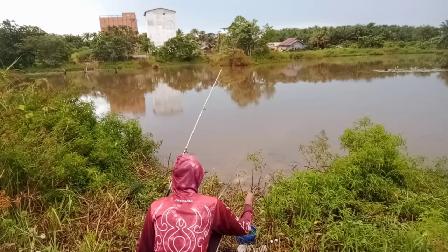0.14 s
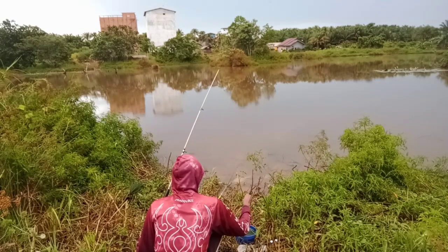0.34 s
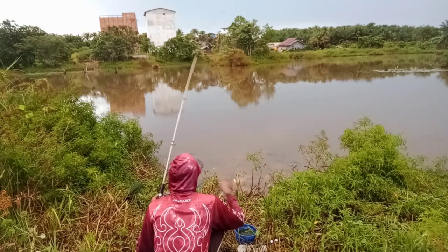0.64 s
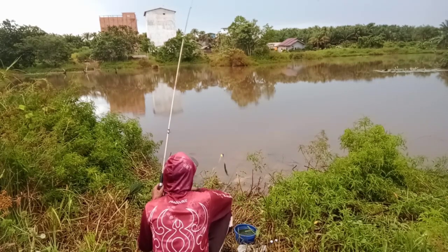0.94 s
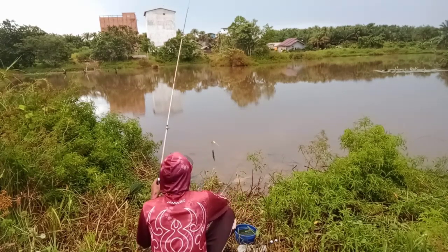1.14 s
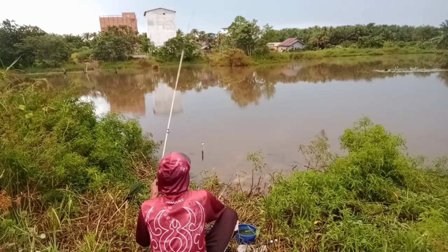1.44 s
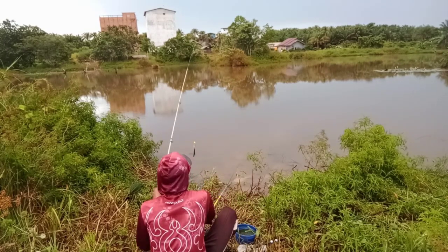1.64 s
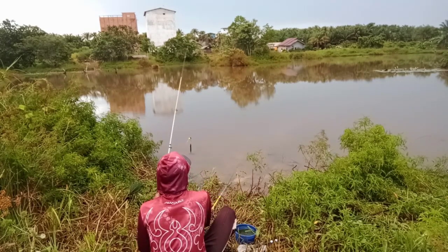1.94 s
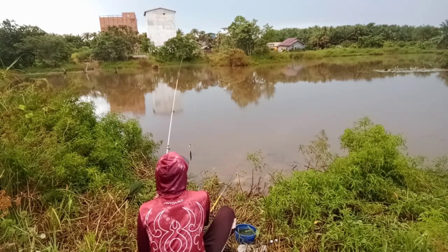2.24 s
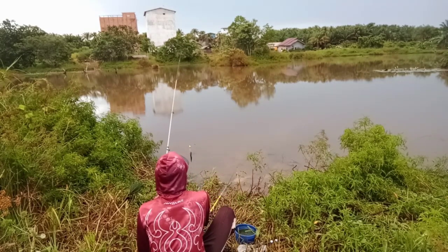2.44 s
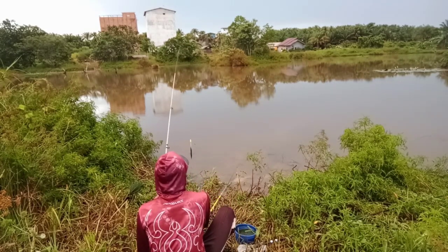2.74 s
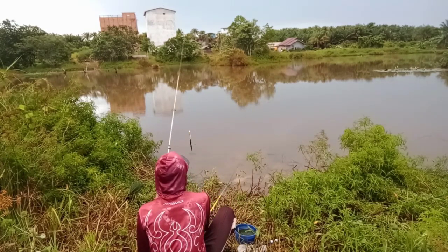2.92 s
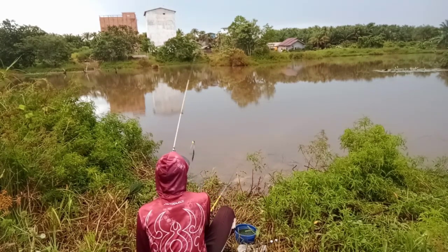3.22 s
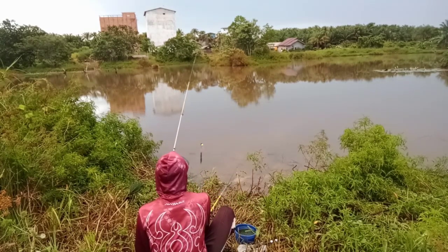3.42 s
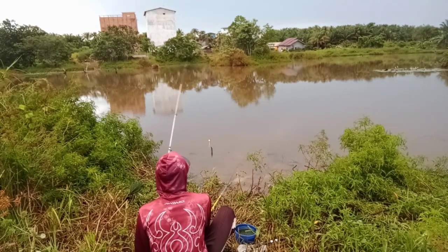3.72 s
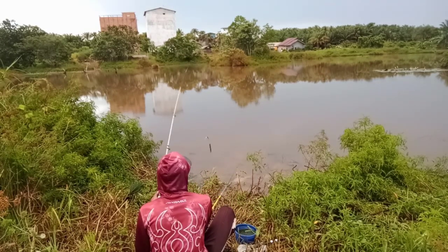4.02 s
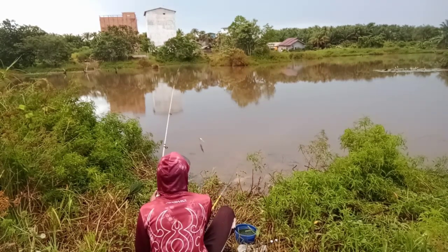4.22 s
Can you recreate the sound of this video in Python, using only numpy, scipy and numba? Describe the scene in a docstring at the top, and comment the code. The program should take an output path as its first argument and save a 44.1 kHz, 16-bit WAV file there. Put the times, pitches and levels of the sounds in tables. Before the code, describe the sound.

A close frog croaks quickly over other clicking, trilling frogs, high insect rasps and a faint distant chorus.

```python
"""Evening at a pond

A phone on the bank. Close by, a frog croaks about six times a second on two beating membranes; further
off, another answers higher up, and others tick, trill and whoop. A katydid scrapes its wings, mostly four
strokes at a time. Crickets sing and a thin whine grows over a distant chorus, hiss and a far rumble."""
import sys
import numpy as np
from scipy import signal
from scipy.fft import rfft, irfft
from scipy.io import wavfile
from scipy.ndimage import uniform_filter1d
from numba import njit

SR = 44100
rng = np.random.default_rng(int(sys.argv[2]) if len(sys.argv) > 2 else 0)


def log_audio(samples):
    """Write samples as a 16-bit WAV file to the path given in sys.argv[1]."""
    # one column per channel
    frames = np.atleast_2d(samples).T
    # limit to full scale, then quantise
    limited = np.clip(frames, -1, 1)
    pcm = np.round(limited * 32767).astype(np.int16)
    wavfile.write(sys.argv[1], SR, pcm)


N = 192849


def undb(db):
    """Decibels to gain."""
    return 10 ** (np.asarray(db) / 20)


def unit(x):
    """Scale to an rms of 1."""
    return x / np.sqrt(np.mean(x ** 2))


def sine(hz):
    """A sine that follows a pitch given sample by sample."""
    return np.sin(2 * np.pi * np.cumsum(hz) / SR)


@njit
def svf(x, hz, width):
    """State-variable band-pass whose centre may move; gain 1 at the centre."""
    y, band_state, low_state = np.empty(len(x)), 0., 0.
    for i in range(len(x)):
        g, damping = np.tan(np.pi * hz[i] / SR), width / hz[i]
        v = (band_state + g * (x[i] - low_state)) / (1 + g * (g + damping))
        band_state, low_state = 2 * v - band_state, low_state + 2 * g * v
        y[i] = damping * v
    return y


def band(x, hz, width):
    """A resonance applied twice, so its skirts are steep."""
    hz, width = hz * np.ones(N), float(width)
    return svf(svf(x, hz, width), hz, width)


def walk(rate):
    """Random levels held 1 / rate s and smoothed twice; rms 1."""
    hold = int(SR / rate)
    steps = np.repeat(rng.standard_normal(N // hold + 1), hold)
    return unit(uniform_filter1d(uniform_filter1d(steps, hold), hold)[:N])


def pulses(hz, jitter, scatter_db, breath):
    """One click a cycle, wavering in rate and size, with air noise gated by the cycle."""
    phase = np.cumsum(hz * (1 + jitter * walk(300))) / SR
    click = np.exp(40 * (np.cos(2 * np.pi * phase) - 1))
    sizes = undb(scatter_db * rng.standard_normal(int(phase[-1]) + 2))
    air = unit(rng.standard_normal(N) * (.4 + click))
    return unit(click * sizes[np.round(phase).astype(int)]) + breath * air


def coloured(spectrum, flicker_db, per_octave):
    """Noise shaped by (Hz, dB) points, in bands that each flicker alone; rms 1."""
    hz, db = np.transpose(spectrum)
    octave = np.log2(np.arange(1, N // 2 + 2) * SR / N)
    shaped = rfft(rng.standard_normal(N)) * undb(np.interp(octave, np.log2(hz), db, -90, -90))
    out = 0
    for centre in np.arange(np.log2(hz[0]), np.log2(hz[-1]), 1 / per_octave):
        share = np.clip(1 - per_octave * abs(octave - centre), 0, 1)
        out += irfft(shaped * share, N) * undb(flicker_db * walk(18))
    return unit(out)


def add(out, s, piece):
    """Mix a piece in at time s."""
    i = max(int(s * SR), 0)
    out[i:i + len(piece)] += piece[:N - i]


def near_frog():
    """Close to the microphone: two membranes beat near 2.2 kHz, and raspy pulses ring the throat."""
    # Croaks, plus one early soft trill near 2.2 kHz (at .11 s):
    # (time [s], length [s], level [dB], opening boost [dB], catch depth [dB], opening pitch [Hz],
    # catch pitch [Hz], upper throat [dB], low throat [dB])
    calls = [(0.0, 0.047, -35.5, 3.5, 4, 2076, 2135, -49.5, -47),
             (.11, 0.11, -39.5, 0, 4, 2213, 2226, -75, -52),
             (1.206, .063, -35, 2.5, -3.5, 2200, 2250, -37.5, -59),
             (1.349, 0.089, -33, -0.5, -2.5, 2248, 2250, -39.5, -58.5),
             (1.526, 0.091, -31.5, -0.5, -1.5, 2280, 2270, -37.5, -53.5),
             (1.709, 0.097, -30.5, 5.5, 3, 2220, 2120, -39.5, -52),
             (1.888, 0.091, -31.5, -3, -1.5, 2240, 2100, -39.5, -56),
             (2.074, 0.081, -30.5, 1.5, 4.5, 2199, 2050, -38, -55),
             (2.24, 0.092, -30.5, -2, 2.5, 2196, 2190, -39.5, -58),
             (2.407, 0.095, -31.5, -10.5, -2.5, 2198, 2130, -40.5, -58),
             (2.592, 0.093, -30, 2, 5, 2178, 2090, -43.5, -54),
             (2.781, 0.08, -31, -2.5, 8, 2056, 2070, -42, -56),
             (2.954, 0.087, -30.5, 1, 10, 2074, 2070, -44.5, -52.5),
             (3.135, 0.084, -31, 0.5, 11.5, 2114, 2000, -43.5, -57),
             (3.327, .076, -35.5, -5.5, 13, 2027, 2030, -44, -51.5),
             (3.399, 0.081, -40, 10, 3, 2151, 2000, -68, -40),
             (3.49, 0.064, -29.5, 2.5, 17, 2088, 2050, -45, -49),
             (3.649, 0.077, -30.5, 2.5, 10, 2106, 2070, -43.5, -54),
             (3.817, 0.091, -30, -2, 2, 2215, 2120, -42, -56),
             (3.992, 0.091, -31, 4, 3, 2160, 2060, -42.5, -50.5),
             (4.173, 0.085, -31.5, 4, 10, 2127, 2070, -41.5, -52),
             (4.339, .08, -28.5, -4, 6, 2278, 2120, -40, -44)]
    opening_s, catch_s, catch_width_s = .015, .028, .011  # a short first note, then the breath catches
    closing_hz, closing_fade_db = 2213., -10
    sac_gain, upper_gain, low_gain, progress, solo = np.zeros((5, N))
    hz = np.full(N, closing_hz)
    for s, length, db, opening_db, catch_db, opening_hz, catch_hz, upper_db, low_db in calls:
        t = np.arange(int(length * SR)) / SR
        u = t / length
        opening = np.exp(-(t / opening_s) ** 4)
        catch = np.exp(-((t - catch_s) / catch_width_s) ** 2)
        glide = np.interp(t, [0, catch_s, .85 * length], [opening_hz, catch_hz, closing_hz])
        add(hz, s, glide - closing_hz)
        add(sac_gain, s, undb(db + opening_db * opening - catch_db * catch + closing_fade_db * u ** 7))
        add(upper_gain, s, undb(upper_db + 2 * (2 * u - 1) ** 2))  # brightest at onset and end
        add(low_gain, s, undb(low_db + 3.64 * u))
        add(progress, s, u)
        add(solo, s, opening)  # the first membrane opens alone
    sac_gain, upper_gain, low_gain = uniform_filter1d([sac_gain, upper_gain, low_gain], size=150)
    detune_hz = (70 + 28 * walk(40)) * (1 - solo)
    first, second = (undb(1.5 * walk(60)) * sine(hz + side * detune_hz + 25 * walk(200))
                     for side in (1, -1))
    membranes = first + .6 * (1 - solo) * second
    rasp = pulses(hz / 3, jitter=.028, scatter_db=3, breath=.65)
    sac = unit(unit(membranes) + .6 * unit(band(rasp, hz, 520)))
    octave = undb(-11.5) * unit(band(membranes ** 2, 2 * hz, 590))  # the sac wall is not linear
    low = undb(4.1 * walk(70)) * unit(band(rasp, 1347, 270) + 3.06 * band(rasp, 1910, 177))
    # Upper throat resonances: (centre [Hz], width [Hz], relative level [dB])
    throat = [(2885, 940, -7), (3660, 700, -3), (4330, 730, -3.5), (5155, 1000, 1.5), (5710, 900, 1),
              (6210, 380, 0), (7350, 870, -2.5), (8580, 1450, -7), (9890, 630, -15), (11700, 850, -17.5),
              (15500, 2700, -23)]
    upper = unit(sum(undb(db + 2 * walk(120)) * band(rasp, f, width) for f, width, db in throat))
    # the mouth opens late in the call: one resonance sweeps up and swells
    mouth = progress ** 2 * unit(band(rasp, 4300 + 1500 * progress ** 2.57, 720))
    return sac_gain * (sac + octave) + low_gain * low + upper_gain * (upper + mouth)


def crickets():
    """Narrow, unbroken songs: two throb at their own wavering rates, one is a plain hiss."""
    # Songs: (centre [Hz], width [Hz], first level [dB], last level [dB], throb rate [Hz], depth [0-1])
    songs = [(6750, 390, -59, -58.5, 71, 0.47), (5724, 300, -71.5, -58, 130, 0.3),
             (4960, 1000, -63, -55, 57, 0)]
    out = 0
    for hz, width, first_db, last_db, rate, depth in songs:
        throb = 1 + depth * sine(rate * (1 + .069 * walk(5)))
        gain = undb(np.linspace(first_db, last_db, N) + 2.3 * walk(7.93))
        out += gain * throb * unit(band(rng.standard_normal(N), hz, width))
    return out


def distant_chorus():
    """Many far callers blur into a flickering wash that swells and sinks."""
    # Chorus spectrum: (frequency [Hz], relative density [dB])
    spectrum = [(710, -47), (1200, -25), (1750, -22), (1920, -13.5), (2120, -4), (2390, -4), (2540, -3.5),
                (3230, -9.5), (3600, -3.5), (4340, -4), (4840, -7.5), (5790, -3), (6200, -11), (8060, -46),
                (13600, -120)]
    # Its swells: (time [s], level [dB])
    swells = [(0, -41.5), (.21, -47), (.35, -43), (.7, -48.5), (1.4, -46.5), (2.3, -46), (3.2, -55.5),
              (3.52, -45), (3.75, -48), (4.37, -50)]
    gain = undb(np.interp(np.arange(N) / SR, *np.transpose(swells)))
    return gain * coloured(spectrum, flicker_db=5, per_octave=7)


def far_rumble():
    """A low, gently heaving rumble from far beyond the pond."""
    # Rumble spectrum: (frequency [Hz], relative density [dB])
    spectrum = [(15, -34), (25, -34), (69, -3), (124, 2.5), (146, -1), (247, -16), (319, -14.5),
                (606, -24.5), (821, -22), (1060, -26.5), (1150, -33), (1500, -19.5), (2530, -120)]
    return undb(-58 + 1.3 * walk(7)) * coloured(spectrum, flicker_db=3.6, per_octave=3)


def far_insects():
    """Insects a long way off merge into a hiss near 7 kHz."""
    # Hiss spectrum: (frequency [Hz], relative density [dB])
    spectrum = [(5200, -15), (6200, -15), (6900, 2.5), (7900, -19.5), (10500, -22), (11500, -47),
                (15500, -39)]
    return undb(-57.5) * coloured(spectrum, flicker_db=4.3, per_octave=5)


def tick(partials, snap_db):
    """A few milliseconds of ringing on (Hz, dB) partials, with a dry bright snap at the start."""
    t = np.arange(int(.009 * SR)) / SR
    bright_noise = np.convolve(rng.standard_normal(len(t)), [.3, .5, .3, -.3, -.5, -.3], "same")
    snap = undb(snap_db + 4) * np.exp(-t / .0015) * bright_noise
    envelope = (t / .0019 * np.exp(1 - t / .002)) ** 3.3
    ring = sum(undb(db) * np.sin(2 * np.pi * (hz * t + rng.random())) for hz, db in partials)
    return snap + envelope * ring


def ticking_frogs():
    """Lone ticks around the pond, each briefly ringing a throat and its sac."""
    # Ticks: (time [s], level [dB], pitch [Hz], relative low throat [dB], relative snap [dB])
    ticks = [(.0144, -32, 2880, -10.5, -30), (.0313, -33, 3600, -16, -6), (.0614, -38.5, 2840, -12, -23),
             (.0762, -31, 3600, -17, -13), (.1466, -35, 3770, -6.5, -25), (.162, -29, 3540, -16, -13.5),
             (0.2521, -29.5, 2800, -14.5, -39), (.2634, -41.5, 3570, -2, -38),
             (0.3267, -26.5, 3490, -19.5, -36), (0.3913, -26.5, 2830, -34, -38),
             (.4154, -38.5, 3520, -6, -27), (0.5185, -32.5, 3580, -18, -19.5), (0.731, -29, 3530, -34, -39),
             (0.7476, -30.5, 2720, -18, -34), (0.7536, -29, 3000, -23, -17), (.9168, -33, 3600, -20, -8),
             (0.9382, -31.5, 2940, -25, -13), (1.0114, -39.5, 3430, -4.5, -29),
             (1.0238, -33.5, 3590, -19, -43), (1.0344, -29, 3520, -35, -42), (1.062, -30.5, 3540, -41, -43),
             (1.0882, -30, 2940, -34, -9.5), (1.2531, -36, 3720, -1, -17), (1.277, -29.5, 3527, -16, -35),
             (1.2902, -30, 3016, -14, -38), (1.2968, -27, 2940, -18, -40), (1.73, -30, 3510, -18, -10),
             (1.7434, -27.5, 2883, -13.5, -13), (2.1365, -34.5, 3400, -7.5, -24),
             (2.1635, -32.5, 2920, -11.5, -33), (2.6032, -27.5, 3640, -35, -31),
             (2.6279, -28.5, 2826, -12, -22), (3.6193, -30, 3500, -7, -27), (3.7906, -41, 3733, -30, -25),
             (3.812, -34, 2885, -25, -25), (3.9456, -35, 3477, -19, -30), (3.9578, -32, 3480, -25, -36),
             (3.9778, -33, 3685, -20, -24), (3.9959, -32, 2792, -10, -30), (4.0063, -24.5, 2923, -20, -37),
             (4.0198, -27.5, 2753, -18, -30), (4.3039, -37, 3610, -19, -32), (4.3114, -41, 3683, -27, -14),
             (4.3251, -37, 3650, -25, -9), (4.353, -32.5, 3085, -8, -27)]
    out = np.zeros(N)
    for s, db, hz, low_db, snap_db in ticks:
        throat, sac = (1400, low_db), (2150, low_db + 11)
        partials = [(hz, 0), throat, sac, (.802 * hz, -9), (1.22 * hz, -9)]
        add(out, s - .001, undb(db) * tick(partials, snap_db))
    return out


def trilling_frogs():
    """Fast, uneven runs of ticks that swell and fade."""
    # Trills: (start [s], end [s], tick rate [Hz], level [dB], pitch [Hz], second partial [Hz],
    # its relative level [dB])
    trills = [(.165, .432, 84.7, -30, 3515, 4700, -15), (.108, .305, 72, -40, 1370, 2870, 3),
              (.325, 0.47, 60, -43.5, 1384, 2250, -1), (.112, 0.14, 140, -42, 5400, 5700, -19),
              (2.72, 2.87, 140, -46, 4700, 1820, -3.5), (3.405, 3.485, 180, -38, 2790, 1890, 3),
              (3.528, 3.585, 210, -31.5, 2880, 3570, 1.5), (3.815, 3.9, 170, -32.5, 2906, 1393, -10)]
    out = np.zeros(N)
    for start, end, rate, db, hz, second_hz, second_db in trills:
        for s in np.arange(start, end, 1 / rate):
            swell = np.sin(np.pi * (.1 + .8 * (s - start) / (end - start))) ** .5
            detune, size_db, late_s = [.008, 2, .0006] * rng.standard_normal(3)
            partials = [(hz * (1 + detune), 0), (second_hz * (1 + detune), second_db),
                        (.8 * hz, -11), (.613 * hz, -12), (1.6 * hz, -14)]
            add(out, s - .002 + late_s, swell * undb(db + size_db) * tick(partials, snap_db=-24))
    return out


def katydid():
    """Wing strokes drag a scraper over teeth; each swells and dies, later ones in a group louder."""
    # Groups of strokes: (time [s], strokes [count])
    rasps = [(.086, 4), (.337, 4), (.6155, 4), (.888, 4), (1.0859, 1), (1.161, 4), (1.42, 4), (1.6756, 4),
             (1.9121, 5), (2.1912, 4), (2.4467, 4), (2.7072, 4), (2.9597, 4), (3.24, 4), (3.5187, 4),
             (3.7698, 4), (4.0264, 4), (4.2698, 4)]
    # Wing resonances: (centre [Hz], width [Hz], relative level [dB])
    wing = [(14700, 600, 0), (15250, 600, 0), (13900, 1300, -11), (12000, 2500, -21)]
    spacing_s, teeth_per_s, rise_db_per_s, fall_db_per_s = .0315, 450, 1500, 1098
    t = np.arange(-.025, .04, 1 / SR)  # the stroke peaks at t = 0
    stroke_db = np.minimum(rise_db_per_s * t, -fall_db_per_s * t) - 49
    gain = np.zeros(N)
    for s, count in rasps:
        for k in range(count):
            add(gain, s - .023 + k * spacing_s, undb(stroke_db + 1.2 * k))
    teeth = pulses(teeth_per_s, jitter=.046, scatter_db=4, breath=2.5)
    scrape = unit(signal.lfilter([1, -2, 1], 1, teeth))  # tilted toward the treble
    return gain * unit(sum(undb(db) * unit(band(scrape, hz, width)) for hz, width, db in wing))


def further_frog():
    """Further off: short rough notes near 4 kHz, each with a rising note near 2 kHz that peaks later."""
    # Answering calls: (time [s], length [s], level [dB], pitch [Hz], lower note level [dB])
    answers = [(0.447, 0.039, -41, 4127, -40), (0.535, 0.038, -42, 4150, -44.5),
               (0.627, 0.063, -45, 4270, -46), (0.759, 0.035, -39, 4010, -41.5),
               (0.865, 0.032, -45.5, 4105, -42), (0.974, 0.04, -42.5, 4006, -44),
               (1.078, 0.053, -41, 4147, -45.5), (1.186, .058, -42.5, 4190, -65),
               (1.309, 0.06, -38.5, 4120, -42.5), (1.44, .059, -44, 4056, -39),
               (1.682, 0.057, -39.5, 4150, -46.5), (1.824, .06, -45.5, 4247, -35),
               (1.967, 0.031, -47, 4215, -38), (2.066, 0.043, -41, 4180, -60),
               (2.187, 0.057, -42, 4260, -38), (2.325, 0.058, -42.5, 4240, -38),
               (2.456, 0.06, -42, 4222, -41), (2.712, 0.052, -37, 4042, -40), (2.834, .053, -37, 3956, -40),
               (2.963, 0.062, -35, 3833, -42), (3.094, 0.049, -36, 3933, -46.5),
               (3.213, 0.052, -35, 3813, -43), (3.332, 0.05, -34.5, 3863, -53),
               (3.444, .056, -34.5, 3741, -49), (3.581, 0.044, -34.5, 3810, -45),
               (3.693, 0.047, -33.5, 3775, -42), (3.818, 0.041, -29.5, 3796, -37),
               (4.083, 0.053, -47, 4073, -63)]
    glide_hz = 60
    hz, lower_hz, gain, lower_gain = np.zeros((4, N))
    for s, length, db, note_hz, lower_db in answers:
        u = np.linspace(0, 1, int(length * SR))
        add(hz, s, note_hz + glide_hz * (u - .5))
        add(lower_hz, s, .53 * note_hz * (1 + .14 * (u ** 2 - .3)))
        add(gain, s, undb(db) * np.sin(np.pi * u) ** .63)
        add(lower_gain, s, undb(lower_db) * np.sin(np.pi * u ** 1.3) ** .9)
    hz, lower_hz = np.clip(hz, 3400, 4800), np.clip(lower_hz, 1800, 2600)
    voice = pulses(hz / 6, jitter=.03, scatter_db=3, breath=.8)
    lower_voice = pulses(lower_hz / 3, jitter=.03, scatter_db=3, breath=.8)
    return gain * unit(band(voice, hz, 510)) + lower_gain * unit(band(lower_voice, lower_hz, 280))


def whoops():
    """Brief falling tones, a little hoarse, from low whoops to thin chirps."""
    # Calls: (time [s], level [dB], start pitch [Hz], end pitch [Hz], length [s])
    calls = [(0.801, -40.5, 6330, 5500, 0.042), (1.67, -37.5, 3108, 2730, 0.025),
             (2.36, -42.5, 3050, 2784, 0.056), (2.7, -67.5, 753.5, 725, 0.13),
             (2.89, -67.5, 745, 709.5, .15), (3.21, -68, 730, 706, .07), (3.379, -23.5, 1551, 1212, 0.0275),
             (3.76, -66, 809, 792, 0.055), (4.01, -64, 814, 800, 0.068), (4.024, -27, 1542, 1278, .013)]
    hoarseness = undb(1.8 * walk(400))
    out = np.zeros(N)
    for s, db, start_hz, end_hz, length in calls:
        n = int(length * SR)
        add(out, s, undb(db) * np.hanning(n) * hoarseness[:n] * sine(np.geomspace(start_hz, end_hz, n)))
    return out


def insect_whine():
    """One insect holds a thin, slightly wavering note that creeps in and later drops away."""
    # Rise and fall of the note: (time [s], level [dB])
    swell = [(0, -106), (1.9, -58), (4.15, -65), (4.25, -76), (4.37, -76)]
    db = np.interp(np.arange(N) / SR, *np.transpose(swell)) + 2.4 * walk(40)
    return undb(db) * np.sqrt(2) * sine(6015 + 15 * walk(30))


def bank_echo(x, t60_s, db):
    """Water and bushes send a short diffuse tail back to the microphone."""
    t = np.arange(int(.25 * SR)) / SR
    tail = rng.standard_normal(len(t)) * np.exp(-np.log(1000) * t / t60_s) * (t > .002)
    return x + undb(db) * signal.fftconvolve(x, tail / np.linalg.norm(tail))[:N]


def ground_dip(x, hz, width_hz, depth):
    """Sound arriving by way of the ground partly cancels a narrow band at the microphone."""
    return x - depth * svf(x, np.full(N, hz), width_hz)


def scene():
    """The pond in mono from the bank: callers and their echo in front, chorus and rumble behind."""
    frogs = near_frog() + further_frog() + ticking_frogs() + trilling_frogs()
    # such small throats radiate almost nothing below about 1.2 kHz
    throat_edge = signal.cheby1(8, 1, 1257, "high", fs=SR, output="sos")
    callers = signal.sosfilt(throat_edge, frogs) + whoops() + katydid()
    callers = bank_echo(callers, t60_s=.06, db=-13)
    chorus, rumble = distant_chorus(), far_rumble()
    pond = callers + crickets() + far_insects() + chorus
    pond = ground_dip(pond, hz=6320., width_hz=450., depth=.6)
    return (pond + insect_whine() + rumble)[None]


def record(dry):
    """The phone cuts the top steeply above 15.6 kHz."""
    return signal.sosfilt(signal.ellip(12, .2, 90, 15600, fs=SR, output="sos"), dry)


dry = scene()
out = record(dry)
log_audio(out)
```